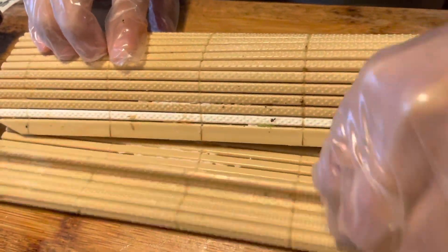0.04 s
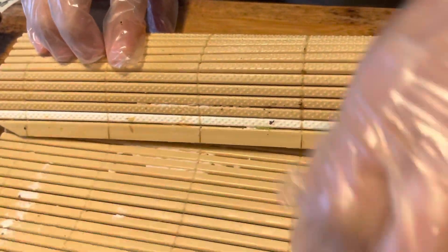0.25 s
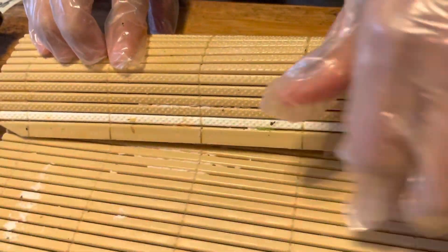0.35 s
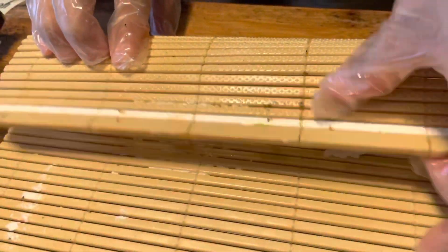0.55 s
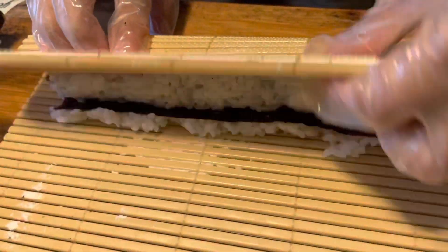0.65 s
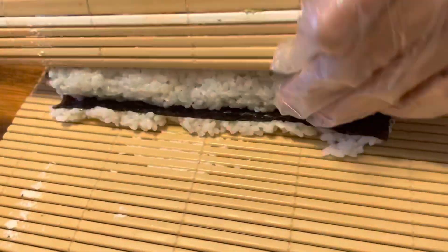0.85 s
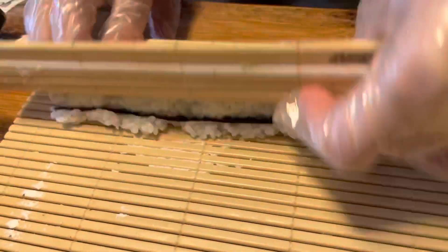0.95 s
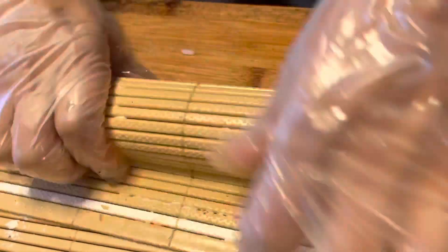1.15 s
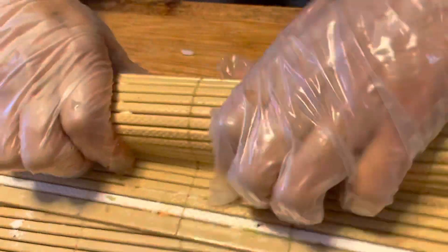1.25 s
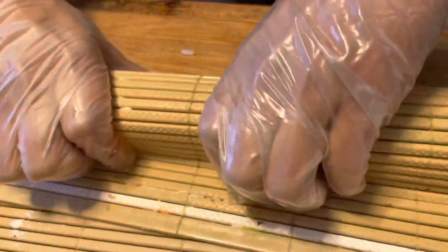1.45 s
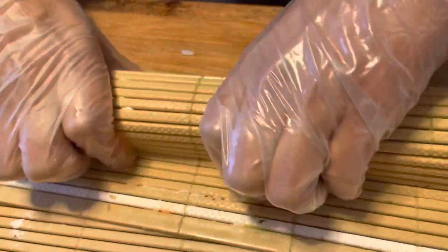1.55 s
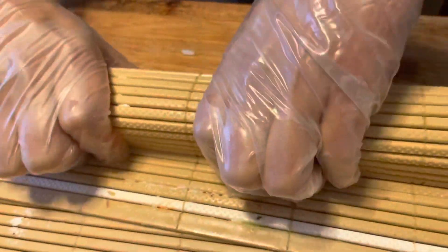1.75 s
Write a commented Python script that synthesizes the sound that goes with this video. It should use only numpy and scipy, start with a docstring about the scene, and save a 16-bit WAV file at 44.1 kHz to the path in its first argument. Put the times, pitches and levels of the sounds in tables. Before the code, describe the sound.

Close up in a small room, bamboo slats drop onto wood in a quick clatter, then knock again about a second later. Plastic gloves rustle softly between and afterwards, and the squeezed mat creaks faintly.

```python
"""Rolling food in a bamboo mat.

Hands in thin plastic gloves work on a wooden board, close by in a small room.
The mat's edge clatters down and later knocks once more, ringing slats and board; the table thuds.
In between and after, gloves and slats slide with soft swishes, ticks and faint creaks."""
import sys
import numpy as np
from scipy import signal
from scipy.fft import rfft, irfft
from scipy.io import wavfile
from scipy.ndimage import uniform_filter1d

SR = 44100
rng = np.random.default_rng(int(sys.argv[2]) if len(sys.argv) > 2 else 0)


def output_pcm(signal):
    """Save a mono or channel-first signal as 16-bit PCM at the path in sys.argv[1].

    Samples are clipped to [-1, 1] before scaling.
    """
    pcm = np.clip(np.atleast_2d(signal).T, -1, 1) * 32767
    wavfile.write(sys.argv[1], SR, np.round(pcm).astype(np.int16))


N = 79380
TIME = np.arange(N) / SR


def from_db(db):
    """Decibels to gain."""
    return 10 ** (np.asarray(db) / 20)


def at_hz(points, hz):
    """Interpolate (Hz, value) rows on a log-frequency axis."""
    points_hz, values = np.transpose(points)
    return np.interp(np.log(np.maximum(hz, 1)), np.log(points_hz), values)


def panned(db):
    """Stereo gains, left over right by db."""
    return from_db(np.array([[db], [-db]]) / 2)


def add(out, start_s, sound):
    """Mix a sound in at start_s."""
    start = int(np.clip(start_s * SR, 0, N - 1))
    out[:, start:start + sound.shape[-1]] += sound[..., :N - start]


def noise(spectrum, correlation):
    """Stereo noise, rms 1; left-right correlation is a number or a table over Hz."""
    hz = np.arange(N // 2 + 1) * SR / N
    mid, side = rfft(rng.standard_normal((2, N)))
    alike = correlation if np.isscalar(correlation) else at_hz(correlation, hz)
    stereo = np.sqrt(1 + alike) * mid + np.sqrt(1 - alike) * side * [[1], [-1]]
    x = irfft(stereo * from_db(at_hz(spectrum, hz)), N)
    return x / x.std()


def decay(t, t60_s):
    """Exponential fall, 60 dB in t60_s."""
    return np.exp(-np.log(1000) * t / t60_s)


def stick_slip(depth_db, rate_hz):
    """Fast gain flutter of sticking and slipping."""
    flutter = uniform_filter1d(rng.standard_normal(N), int(SR / rate_hz))
    return from_db(depth_db * flutter / flutter.std())


def rumble():
    """Steady low background noise, wider in the treble."""
    # Each row: frequency in Hz, spectral density in dB.
    spectrum = [(25, -17), (45, -2.5), (100, -3), (150, -7.5), (300, -13.5), (600, -20.5), (1500, -22),
                (4000, -28.5), (12000, -31), (16000, -48)]
    # Each row: frequency in Hz, left-right correlation.
    correlation = [(60, 0.9), (180, .8), (600, 0.2), (5000, 0.047)]
    return from_db(-53) * noise(spectrum, correlation)


def knocks():
    """Slats hit the board: damped modes, dulled by contact softness, with a short crack on top."""
    # Each row: start in seconds, peak in dB, contact cut-off in Hz, pitch ratio,
    # board mode gain in dB, crack in dB re peak, pan in dB.
    hits = [(.0755, -40.5, 2230, 1.13, -12.5, -31, -2), (.0780, -39, 523, .85, 7, -37, -1),
            (.1824, -25, 840, 1.08, -4.5, -37, 2), (.1998, -15, 2000, 1.19, -28, -8, -2),
            (.2018, -12.5, 1460, 0.86, 3.5, -10, -2.5), (.2066, -18, 1000, 0.96, -7, -40, 2),
            (.2108, -13.5, 1960, 1.38, 2, -13, -0.5), (.2138, -3.5, 2890, 1.01, 7, -5.5, 3.5),
            (.2872, -8.5, 1250, 0.99, -4.5, -17.5, -1), (.3178, -28, 950, 0.95, 5, -35, 0),
            (.4440, -39.5, 1070, 0.81, -3, -11, 3), (.4865, -35.5, 970, 0.9, -5.5, -2, 0),
            (.5040, -39.5, 1010, 0.95, -5, -14, -2), (.6205, -41.5, 857, .9, 7.5, -26, -1),
            (.7775, -41.5, 750, 1.12, 6, -29, -2.5), (.9280, -48, 750, 0.88, -1, -39, -0.5),
            (.9460, -44, 960, 0.88, 1, -15, 1), (1.0765, -32, 1093, 0.75, -9, -25, 3),
            (1.1264, -11.5, 1110, 0.921, 0, -32, -0.5)]
    # Low board modes, higher slat modes. Each row: frequency in Hz, level in dB, T60 in seconds, pan in dB.
    modes = [(253.6, -19.5, 0.054, -0.5), (552, -1, 0.017, 10), (595.7, -1.5, 0.024, 5.5),
             (846, -3.5, .022, 10), (1117, 5.5, 0.019, -1), (1298, -1.5, 0.019, 2), (1583, -8, 0.012, 21),
             (2012, -15.5, 0.0081, -5), (2360, -11.5, 0.013, 5), (2972, -7.5, 0.0088, 16),
             (3900, -18.5, 0.0099, -6.5), (4290, -10.5, 0.02, 13), (5860, -5.5, .006, 2)]
    board_below_hz, scatter_db, swell_cycles = 700, 3.73, 0.92
    crack_rise_s, crack_t60_s = 0.00048, 0.012
    out, t = np.zeros((2, N)), TIME[:SR // 12]
    crack_spectrum = [(1000, -10.5), (2000, 12), (3500, 2.5), (5500, 0.5), (7000, -4), (11500, -2.5),
                      (16000, -16.5)]  # Each row: frequency in Hz, spectral density in dB.
    crack_noise = noise(crack_spectrum, correlation=0.26) * panned(0.5)
    crack_envelope = (1 - np.exp(-t / crack_rise_s)) * decay(t, crack_t60_s)
    for i, (start_s, peak_db, cutoff_hz, pitch, board_db, crack_db, pan_db) in enumerate(hits):
        body = 0
        for hz, mode_db, t60_s, mode_pan_db in modes:
            level_db = mode_db + scatter_db * rng.standard_normal() + board_db * (hz < board_below_hz)
            cycles = hz * pitch * t
            swell = 1 - np.exp(-(cycles / swell_cycles) ** 2)
            ring = np.sin(2 * np.pi * cycles) * swell * decay(t, t60_s)
            body = body + from_db(level_db) * panned(mode_pan_db) * ring
        body = signal.sosfilt(signal.butter(3, cutoff_hz, fs=SR, output="sos"), body)
        body /= abs(body.mean(0)).max()
        crack = from_db(crack_db) * crack_noise[:, i * len(t):(i + 1) * len(t)] * crack_envelope
        add(out, start_s, from_db(peak_db) * panned(pan_db) * (body + crack))
    return out


def thuds():
    """The table gives under the hands: a few slow swings that swell, sag in pitch and die."""
    # Each row: start in seconds, peak in dB, final frequency in Hz.
    presses = [(0.083, -41.5, 95), (0.208, -27.5, 86.7), (0.288, -32.5, 92.7), (0.36, -44, 177.3),
               (0.441, -39.5, 92.5), (0.486, -36, 95.7), (0.634, -52, 59.6), (0.804, -46, 99.6),
               (0.981, -48.5, 93.6), (1.064, -38, 97.5), (1.116, -36, 98.6), (1.125, -43, 48),
               (1.234, -42.5, 50.5), (1.261, -40.5, 105.5), (1.300, -43, 48), (1.546, -44.5, 57),
               (1.726, -52.5, 100.6)]
    swell_s, glide = 0.015, 0.09
    out = np.zeros((2, N))
    age = TIME[:SR // 4] / swell_s
    envelope = (age * np.exp(1 - age)) ** 1.36
    pitch = 1 + glide * np.exp(-age / 2)
    for start_s, peak_db, hz in presses:
        phase = 2 * np.pi * hz * np.cumsum(pitch) / SR
        add(out, start_s, from_db(peak_db) * envelope * np.sin(phase))
    return out


def sliding():
    """Strokes swell and fade: a fine bright hiss of glove film, a duller, coarser rub of slats."""
    # Each row: peak time, rise and fall in seconds, glove hiss in dB, slat rub in dB.
    strokes = [(0.143, 0.039, 0.057, -48.5, -56.5), (0.487, 0.15, 0.067, -53.5, -56.5),
               (.625, 0.16, 0.14, -50.5, -59.5), (0.734, 0.041, 0.03, -50, -86),
               (0.819, 0.041, 0.042, -49, -63), (.875, 0.026, 0.053, -56, -61.5),
               (0.971, 0.05, 0.08, -49, -57.5), (1.076, 0.077, 0.071, -42, -47),
               (1.159, 0.049, 0.037, -52, -44.5), (1.215, 0.061, 0.092, -44.5, -46),
               (1.334, .03, 0.15, -62, -63), (1.520, 0.025, 0.069, -57, -63.5),
               (1.578, 0.027, 0.03, -59.5, -51), (1.640, 0.03, 0.051, -56.5, -55),
               (1.746, 0.0077, 0.01, -49.5, -74), (1.795, 0.048, .05, -54, -59)]
    # Each row of both: frequency in Hz, spectral density in dB.
    hiss_spectrum = [(1000, -29.5), (2500, -2.5), (4500, 0), (7000, -2.5), (9500, 1), (12000, 3.5),
                     (14000, -11), (16000, -16)]
    rub_spectrum = [(120, -11.5), (280, -5.5), (600, -4), (1300, -7.5), (2200, -8), (3500, -15),
                    (6000, -25.5), (12000, -43)]
    edge_db = -17  # one rise or fall time from the peak
    hiss_power, rub_power = 0, 0
    for peak_s, rise_s, fall_s, hiss_db, rub_db in strokes:
        shape_db = edge_db * np.maximum((peak_s - TIME) / rise_s, (TIME - peak_s) / fall_s) ** 1.93
        hiss_power += from_db(hiss_db + shape_db) ** 2
        rub_power += from_db(rub_db + shape_db) ** 2
    hiss = stick_slip(depth_db=2.96, rate_hz=1400) * noise(hiss_spectrum, correlation=0.1)
    rub = stick_slip(depth_db=3.0, rate_hz=300) * noise(rub_spectrum, correlation=0.29)
    return np.sqrt(hiss_power) * hiss * panned(0.39) + np.sqrt(rub_power) * rub * panned(2.8)


def ticks():
    """Film and slats snap: one quickly damped ring each, left and right starting at slightly different phases."""
    # Each row: start in seconds, peak in dB, frequency in Hz, T60 in seconds.
    snaps = [(.1303, -22, 10600, 0.0016), (.1303, -33.5, 3780, 0.0044), (0.138, -32.5, 4230, 0.0036),
             (.1570, -34.5, 4250, 0.0085), (0.1643, -32.5, 2320, 0.0022), (0.454, -36, 4160, 0.0054),
             (.4842, -32, 11700, 0.0049), (.6390, -24.5, 4240, 0.0018), (.8250, -40, 11600, .003),
             (.9480, -33, 3670, 0.006), (1.0690, -24, 11100, 0.0013), (1.082, -48, 5060, 0.0045),
             (1.1506, -40, 3236, .05), (1.6230, -43, 11800, .003), (1.6450, -42.5, 5200, .004),
             (1.6520, -44.5, 5400, .004), (1.6930, -48, 11500, .003), (1.7370, -40, 11840, 0.0028),
             (1.75, -43, 11000, .003), (1.7490, -43, 4500, .003)]
    out, t = np.zeros((2, N)), TIME[:SR // 12]
    for start_s, peak_db, hz, t60_s in snaps:
        phase = 2 * np.pi * hz * t + rng.uniform(-0.93, 1, (2, 1))
        add(out, start_s, from_db(peak_db) * np.sin(phase) * decay(t, t60_s))
    return out


def creaks():
    """Slats of the squeezed roll slip in quick uneven runs, each ringing one broad resonance."""
    # Each row: peak time in seconds, Gaussian width in seconds, level in dB, resonance in Hz.
    squeezes = [(1.034, 0.011, -49.5, 1990), (1.22, 0.037, -55, 2240), (1.332, 0.013, -54, 1810),
                (1.602, 0.024, -52, 1270)]
    slips_per_s, bandwidth_hz = 700, 210
    radius = np.exp(-np.pi * bandwidth_hz / SR)
    out = np.zeros((2, N))
    for peak_s, width_s, level_db, hz in squeezes:
        slips = (rng.random(N) < slips_per_s / SR) * (1 + 0.5 * rng.standard_normal((2, N)))
        feedback = [1, -2 * radius * np.cos(2 * np.pi * hz / SR), radius ** 2]
        ring = signal.lfilter([1, 0, -1], feedback, slips + 1e-18)
        envelope = np.exp(-((TIME - peak_s) / width_s) ** 2 / 2)
        out += from_db(level_db) * envelope * ring / ring.std()
    return out


def room(x):
    """A diffuse tail that dies band by band, longest in the bass."""
    colour = [(60, -7.5), (150, 6), (250, 6.5), (380, 4.5), (580, -1.5), (900, -2.5), (1300, -0.5),
              (2000, 1.5), (3000, -0.5), (6000, -7), (12000, -4.5)]  # Each row: frequency in Hz, level in dB.
    decay_times = [(100, 1), (250, .5), (580, 0.22), (1200, 0.28), (4000, 0.36), (12000, .25)]  # Each row: frequency in Hz, T60 in seconds.
    wet_db, onset_s = -15.5, 0.005
    white = noise([(20, 0), (20000, 0)], correlation=0.44)
    edges_hz = np.geomspace(50, 17000, 13)
    tail, t = 0, TIME[:SR * 2 // 3]
    for low_hz, high_hz in zip(edges_hz, edges_hz[1:]):
        hz = np.sqrt(low_hz * high_hz)
        bandpass = signal.butter(2, [low_hz, high_hz], "band", fs=SR, output="sos")
        band = signal.sosfilt(bandpass, white)[:, -len(t):]
        tail += band * from_db(at_hz(colour, hz)) * decay(t, at_hz(decay_times, hz))
        white = np.roll(white, len(t) // 7, axis=1)  # decorrelates the bands
    tail *= 1 - np.exp(-(t / onset_s) ** 2)
    tail /= np.sqrt((tail ** 2).sum() / 2)
    return from_db(wet_db) * signal.fftconvolve(x.mean(0)[None], tail, axes=1)[:, :N]


def scene():
    """Mat and gloves in the room, over dry table thuds and a low rumble."""
    near = knocks() + ticks() + sliding() + creaks()
    return near + room(near) + thuds() + rumble()


def record(dry):
    """Microphone: deep treble dip, low cut, rounded peaks, high cut."""
    dip_hz, dip_width_hz, dip_db = 8493, 1380, -32
    low_cut_hz, high_cut_hz, ceiling = 30, 16200, 0.88
    b, a = signal.iirnotch(dip_hz, dip_hz / dip_width_hz, fs=SR)
    notched = dry
    for _ in range(3):
        notched = signal.lfilter(b, a, notched)
    dipped = notched + from_db(dip_db) * (dry - notched)
    trimmed = signal.sosfilt(signal.butter(4, low_cut_hz, "high", fs=SR, output="sos"), dipped)
    rounded = trimmed / (1 + (trimmed / ceiling) ** 8) ** (1 / 8)
    return signal.sosfilt(signal.ellip(10, 0.5, 80, high_cut_hz, fs=SR, output="sos"), rounded)


dry = scene()
out = record(dry)
output_pcm(out)
```